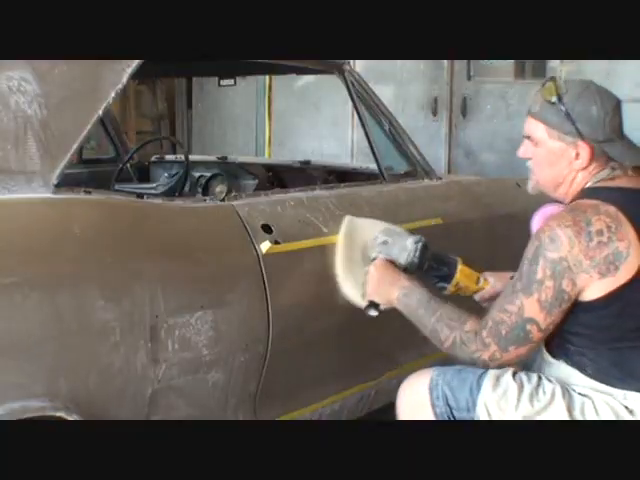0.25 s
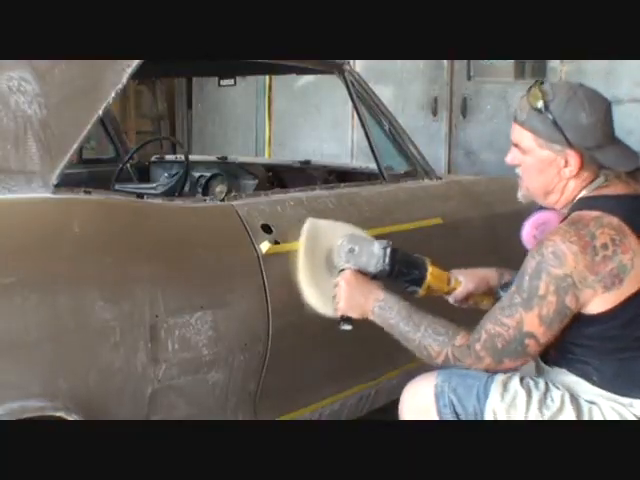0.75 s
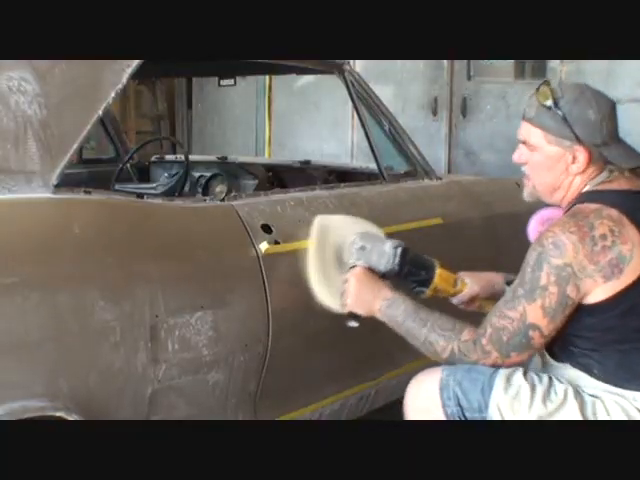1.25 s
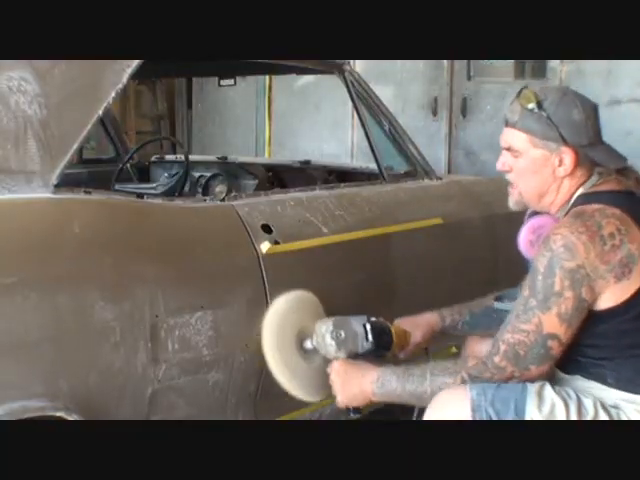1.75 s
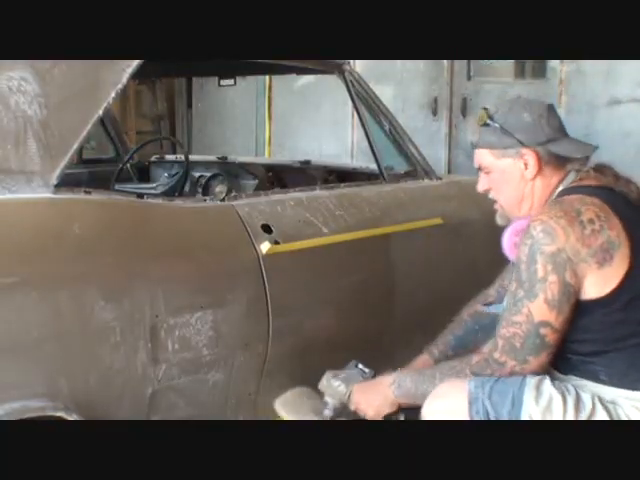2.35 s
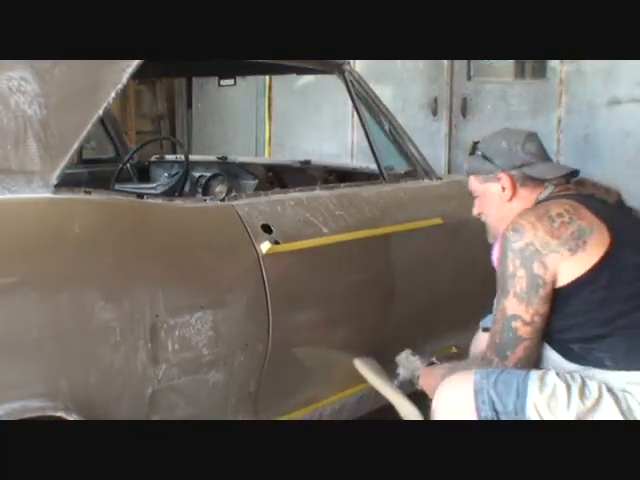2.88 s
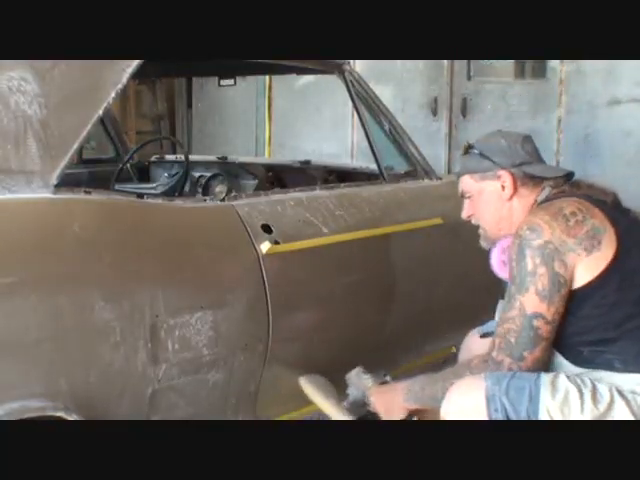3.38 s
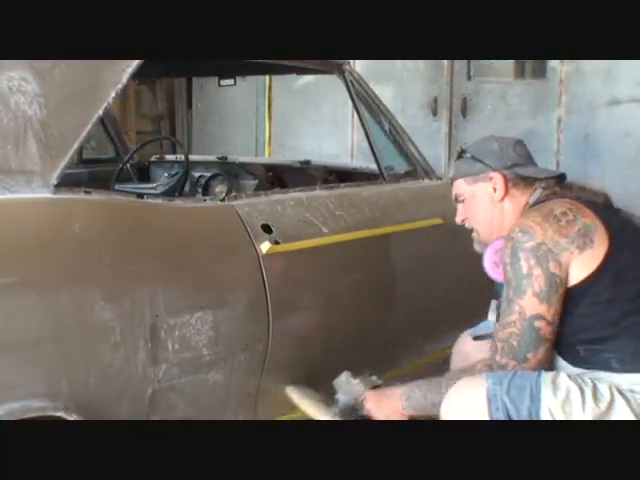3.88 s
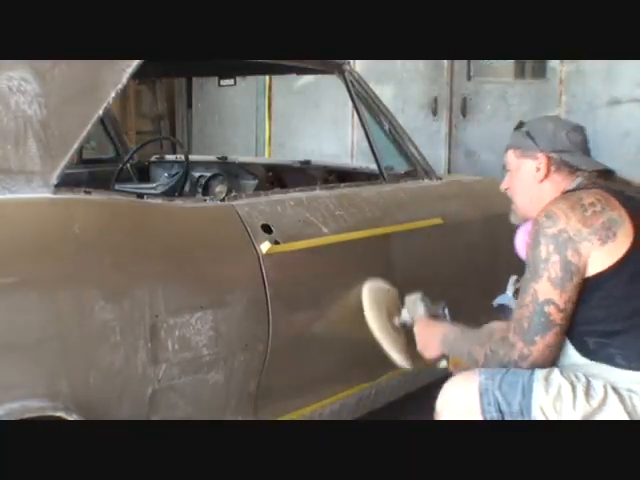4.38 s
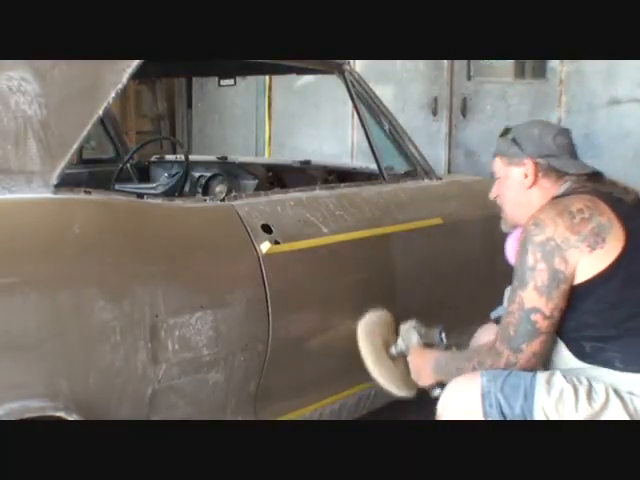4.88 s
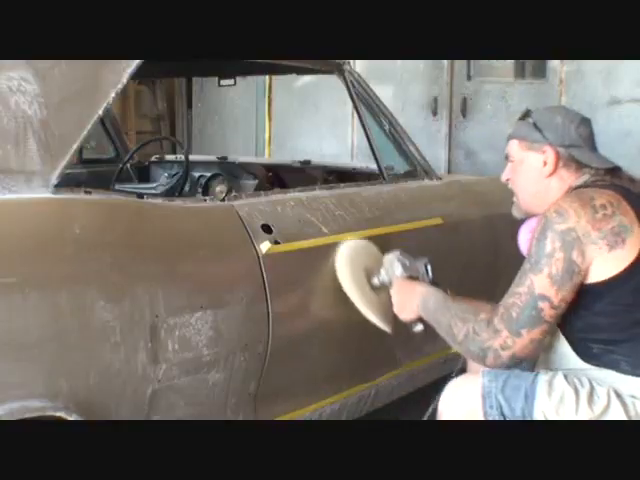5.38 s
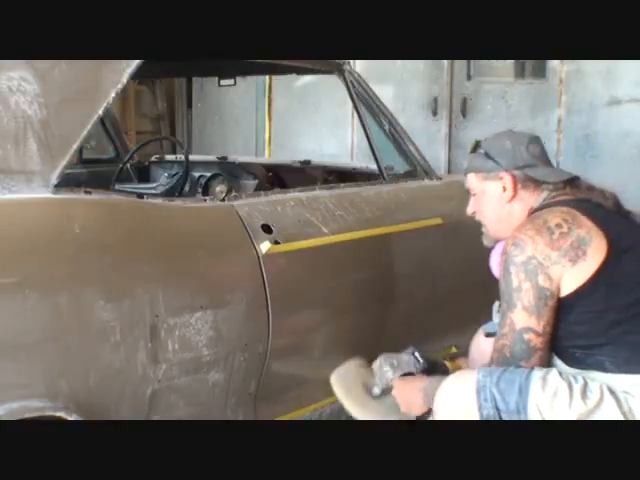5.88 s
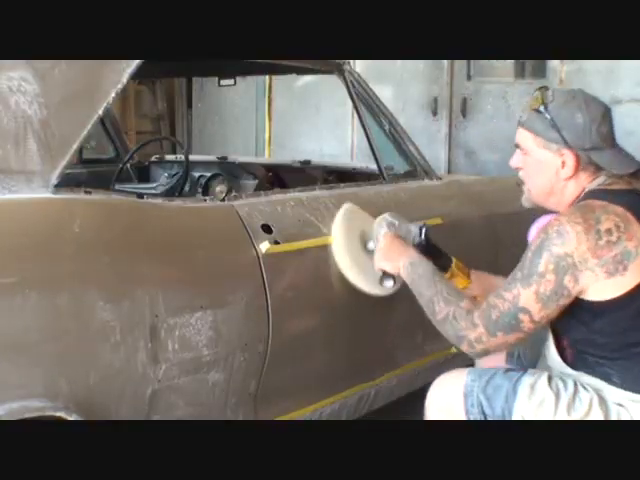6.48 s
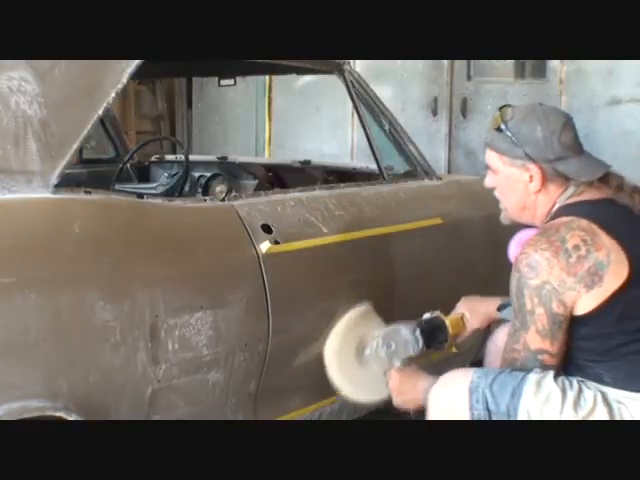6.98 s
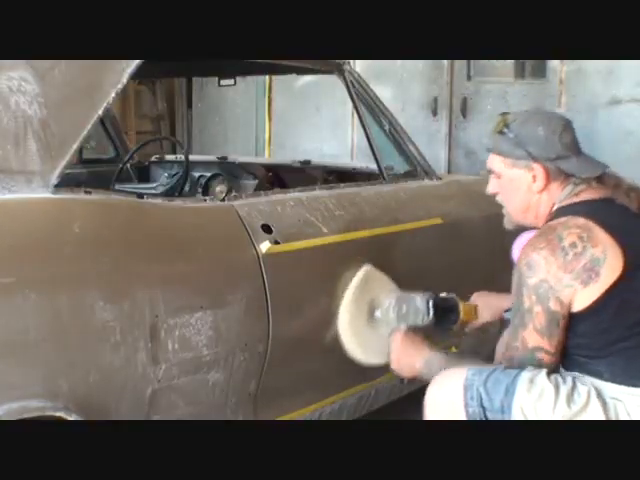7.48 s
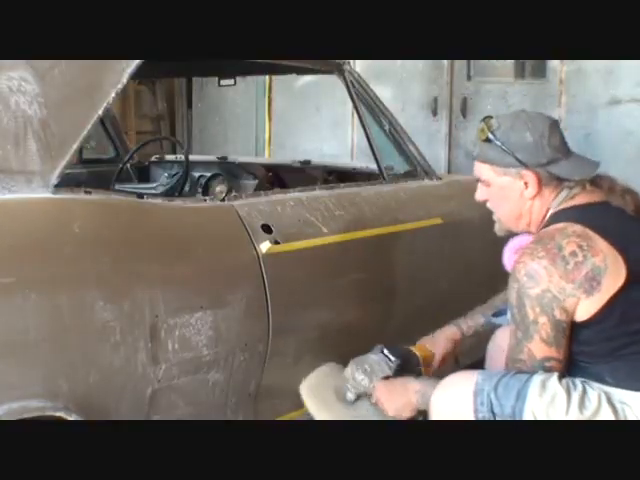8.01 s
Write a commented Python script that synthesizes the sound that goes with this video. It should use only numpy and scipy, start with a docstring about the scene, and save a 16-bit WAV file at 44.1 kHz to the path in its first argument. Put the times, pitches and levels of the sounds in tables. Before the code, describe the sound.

Continuous power polisher on a metal car panel in a reverberant garage. The high whine wavers in pitch and loudness, sometimes with a sharper octave above it, sometimes almost buried in rushing air. The spinning pad scrubs and hisses on the paint, the door drones softly, and a faint rumble sits below. The nearby microphone's gain pumps, pulling the hiss down under each loud whine.

```python
"""A fluttering gear whine swells and fades over rushing air and hiss: a rotary buffer polishes a car door.
One shaft phase drives mesh, motor and pad tones; its speed sags a little when the pad is pressed harder.
Shaped noise makes the fan rush, the pad's rub and hiss on the paint, the door drone and a faint rumble.
Drifting reflections from door and garage walls make the tones swell and fade as the tool is swept about,
and an automatic gain control ducks the hiss under every swell."""
import sys
import numpy as np
from scipy import signal
from scipy.fft import rfft, irfft, next_fast_len
from scipy.io import wavfile
from scipy.ndimage import uniform_filter1d, minimum_filter1d, map_coordinates

SR = 44100
rng = np.random.default_rng(int(sys.argv[2]) if len(sys.argv) > 2 else 0)


def transcribe(signal):
    """Save signal, clipped to [-1, 1], as a 16-bit WAV file at the path in sys.argv[1]."""
    frames = np.atleast_2d(signal).T
    limited = np.clip(frames, -1, 1)
    pcm = np.round(limited * 32767).astype(np.int16)
    wavfile.write(sys.argv[1], SR, pcm)


N = 363825  # samples

PINION_TEETH = 6
GEAR_RATIO = 9  # shaft turns per pad turn


def amp(db):
    """Decibels to gain."""
    return 10 ** (np.asarray(db) / 20)


def unit(x):
    """Scale to rms 1."""
    return x / np.sqrt(np.mean(np.abs(x) ** 2) + 1e-20)


def curves(rows):
    """Interpolate each column after the time to one value per sample."""
    time_s, *columns = np.transpose(rows)
    return [np.interp(np.arange(N) / SR, time_s, column) for column in columns]


def wobble(rate_hz):
    """Smooth random curve of rms 1 with rate_hz knots a second."""
    knots = rng.standard_normal(4096)
    coarse = np.arange(0, N + 16, 16)  # splined every 16 samples, linear between
    curve = map_coordinates(knots, [coarse * rate_hz / SR], mode="wrap")
    return unit(np.interp(np.arange(N), coarse, curve))


def filtered(x, response):
    """Multiply the spectrum of x by a response of frequency in Hz."""
    size = next_fast_len(N + 8192)
    return irfft(rfft(x, size) * response(np.fft.rfftfreq(size, 1 / SR)), size)[:N]


def rush(spectrum, patchy_db):
    """Rushing noise of rms 1: shaped white noise with brief time-frequency patches of random gain."""
    cells = signal.stft(rng.standard_normal(N), nperseg=1024)[2]
    field = uniform_filter1d(rng.standard_normal(cells.shape), size=3, axis=0)
    field = uniform_filter1d(field, size=12, axis=1)
    noise = signal.istft(cells * amp(patchy_db * unit(field)), nperseg=1024)[1][:N]
    f_hz, level_db = np.transpose(spectrum)
    return unit(filtered(noise, lambda hz: amp(np.interp(np.log(hz + 1), np.log(f_hz), level_db))))


def tone(turns, scatter, rate_hz):
    """Tone of rms 1: direct sound plus reflections that drift in strength and phase."""
    paths = 1 + scatter * (wobble(rate_hz) + 1j * wobble(rate_hz))
    return unit(np.real(paths * np.exp(2j * np.pi * turns)))


def fading(depth_db, rate_hz):
    """Gain of a tone whose source moves through the standing waves of the garage."""
    return amp(depth_db * np.tanh(wobble(rate_hz)))


def loaded(law, sag_hz):
    """Gain of a part whose level follows the load, read from the sag of the mesh pitch."""
    free_db, db_per_hz = law
    return amp(free_db + db_per_hz * sag_hz)


def garage(x, wet_db, t60_s):
    """A gliding tone beats against its own decaying echoes; the mean level is held steady."""
    t = np.arange(SR // 2) / SR
    tail = rng.standard_normal(len(t)) * amp(-60 * t / t60_s)
    echoes = signal.fftconvolve(x, tail / np.linalg.norm(tail))[:N]
    heard = x + amp(wet_db) * echoes
    power = uniform_filter1d(uniform_filter1d(heard ** 2, size=2000), size=2000)
    return heard / np.sqrt(np.abs(power) + 1e-6)


def rumble(level_db=-52.5, swell_db=3.5):
    """Faint low rumble of uneven level."""
    # rumble spectrum: f/Hz, relative density/dB
    rumble_spectrum = [(20, -19), (150, -11), (250, -2.5), (350, -1.5), (480, -2), (800, -42)]
    return amp(level_db + swell_db * wobble(7)) * rush(rumble_spectrum, patchy_db=-2)


def air_and_pad(shaft):
    """The pad rubs and hisses on the paint and sets the door droning; the fan chops its air once a shaft turn."""
    # levels as the pad travels over the door: t/s, pad hiss/dB, pad rub/dB, panel drone/dB, fan/dB
    contact = [(0.0, -20, -21, -33, -21.0), (0.93, -22, -22, -42, -19.5), (1.11, -21.0, -24.5, -34, -21.5),
               (1.68, -22.5, -23.5, -45, -20.5), (2.07, -21.5, -25.5, -35, -19),
               (2.55, -21.0, -23, -37.5, -20.5), (3.48, -23, -25, -31.5, -20.5),
               (4.02, -23, -25.5, -36, -21.5), (4.92, -22.5, -26.5, -39.5, -19),
               (5.19, -22, -22, -33.5, -19), (5.49, -22.5, -26, -39.5, -20.5),
               (6.81, -20, -23.5, -39, -19.5), (7.11, -21, -25, -35, -22.0),
               (7.38, -21.5, -24.5, -40.5, -18), (8.07, -20, -23.5, -33, -21.0),
               (8.25, -20.5, -24, -33, -18.5)]
    # door panel drone, pad rub, fan rush and pad hiss spectra: f/Hz, relative density/dB
    panel_spectrum = [(200, -29.5), (330, -16), (410, -6.5), (490, 1), (640, 1), (760, -2.5), (1100, -39)]
    rub_spectrum = [(450, -28), (650, -9), (780, -2), (1050, 1.5), (1350, 2), (1600, 1), (2100, -23),
                    (4000, -60)]
    fan_spectrum = [(900, -61), (1400, -10.5), (1700, 3), (2050, 1), (2300, -0.5), (2700, 1.5), (3150, 3),
                    (3500, -8), (4500, -17), (8000, -60)]
    hiss_spectrum = [(2000, -44), (3000, -4), (3600, -1.5), (4200, 1.5), (5000, 2), (6200, 1), (7200, -0.5),
                     (8200, -2), (9400, -4.5), (10100, -8), (10800, -8.5), (11600, -15), (13500, -18),
                     (15500, -25)]

    hiss_db, rub_db, panel_db, fan_db = curves(contact)
    chop = 1 + 0.036 * tone(shaft, scatter=0.92, rate_hz=110)
    # uneven wool drags in bursts, twice a pad turn and at random
    twice_a_turn = tone(2 * shaft / GEAR_RATIO, scatter=1.8, rate_hz=65)
    nap = amp(1.08 * twice_a_turn + 0.66 * wobble(130))
    panel = amp(panel_db) * rush(panel_spectrum, patchy_db=2.5)
    rub = amp(rub_db) * unit(nap * rush(rub_spectrum, patchy_db=1.67))
    fan = amp(fan_db) * unit(chop * rush(fan_spectrum, patchy_db=2.5))
    hiss = amp(hiss_db) * unit(chop * nap * rush(hiss_spectrum, patchy_db=2.5))
    return panel + rub + fan + hiss


def housing():
    """Narrow housing resonances, stirred by the air flow, swell and die away now and then."""
    # swells: peak t/s, length between 1/e points/s, level/dB
    rings = [(1.71, 0.35, -22.5), (4.313, 0.18, -27), (4.78, 0.23, -24.5), (5.59, 0.12, -26),
             (7.714, 0.26, -29)]
    # housing resonances: f/Hz, width at -6 dB/Hz, relative level/dB
    resonances = [(927.5, 47, -10), (2551.6, 47, -4)]

    def body(hz):
        """Sum of squared one-pole resonances."""
        return sum(amp(db) / (1 + 2j * (hz - f_hz) / width_hz) ** 2 for f_hz, width_hz, db in resonances)

    t = np.arange(N) / SR
    swell = sum(amp(db) * np.exp(-(2 * (t - peak_s) / length_s) ** 2) for peak_s, length_s, db in rings)
    return swell * unit(filtered(rng.standard_normal(N), body))


def motor(shaft, sag_hz, orders_db=-21.0):
    """Fan, teeth and armature sing at shaft multiples; load favours the teeth, speed the armature."""
    # weak motor tones: multiple of shaft speed, level re orders_db/dB
    orders = [(4, -15.5), (8, -13), (11, -23), (15, -21), (20, -21), (22, -16.5), (24, -20), (27, -15.5),
              (30, -20), (36, -24), (42, -41)]
    # load laws of third mesh harmonic and armature whistle: level running free/dB, slope/(dB per Hz of sag)
    third_law = (-34.5, 0.035)
    whistle_law = (-29.5, -0.068)
    armature_order = 21  # whistle cycles per shaft turn

    third = loaded(third_law, sag_hz) * tone(3 * PINION_TEETH * shaft, scatter=0.99, rate_hz=55)
    armature = loaded(whistle_law, sag_hz) * tone(armature_order * shaft, scatter=1.4, rate_hz=70)
    weak = sum(amp(orders_db + db) * tone(order * shaft, scatter=0.89, rate_hz=55) for order, db in orders)
    return third * fading(depth_db=3, rate_hz=7) + armature * fading(depth_db=3.5, rate_hz=7) + weak


def gear_whine(shaft, sag_hz, whine_gain_db=0.47, octave_flutter_db=-8, grit_db=-7, grit_hz=260):
    """Pinion teeth strike the crown wheel, whose uneven load on each pad turn adds sidebands."""
    # whine as the tool is swept about: t/s, level before whine_gain_db/dB
    whine_levels = [(0.0, -7), (0.26, -14), (0.5, -5), (0.6, -6), (0.66, -15), (0.82, -13), (0.9, -2.5),
                    (0.96, -10), (1.52, -11), (1.62, -19), (1.72, -23), (1.82, -17.5), (1.88, -19.5),
                    (2.14, -9.5), (2.2, -19), (2.26, -8), (2.76, -11.5), (2.8, -14.5), (2.86, -9.5),
                    (3.08, 0.5), (3.2, -9.5), (3.58, -7.5), (3.7, -14), (3.88, -0.5), (4.02, -19),
                    (4.12, -8.5), (4.21, -14), (4.31, -10), (4.39, -23), (4.47, -10.5), (4.59, -20),
                    (4.77, -11.5), (4.91, -19), (4.99, -8.5), (5.15, -3.5), (5.37, -8), (5.45, -23.5),
                    (5.61, -9.5), (5.67, -22), (5.75, -14.5), (5.85, -19.5), (5.97, -12), (6.03, -18.5),
                    (6.09, -7), (6.13, -16.5), (6.29, -9), (6.39, -19), (6.47, -12), (6.69, -12),
                    (6.87, -19.5), (6.93, -11), (7.03, -18.5), (7.53, -15), (7.57, -20), (7.95, -9.5),
                    (8.25, -14.5)]
    # octave of the whine, which beams in other directions: t/s, level/dB
    octave_levels = [(0.0, -23.5), (0.66, -21), (1.02, -27), (1.06, -13.5), (1.12, -25.5), (2.1, -24.5),
                     (2.34, -11.5), (2.58, -25.5), (2.8, -22.5), (2.86, -18), (3.74, -19.5), (4.0, -26.5),
                     (4.12, -13), (4.19, -25), (5.11, -23), (5.19, -19), (5.29, -24), (6.03, -26),
                     (6.11, -18.5), (6.23, -25.5), (6.47, -15.5), (6.81, -24), (7.55, -18), (7.65, -30),
                     (7.79, -24), (7.93, -11.5), (8.01, -23), (8.25, -14.5)]
    # mesh sidebands: offset in multiples of pad speed, level re flutter/dB
    sidebands = [(-4, -8.5), (-2, -5.5), (-1, -7.5), (1, -6.5), (2, -10), (4, -7.5)]
    # load law of the flutter: level running free/dB, slope/(dB per Hz of sag)
    flutter_law = (-22, -0.0066)

    whine_db, = curves(whine_levels)
    octave_db, = curves(octave_levels)
    flutter = loaded(flutter_law, sag_hz) * fading(depth_db=3.5, rate_hz=8)
    mesh, pad = PINION_TEETH * shaft, shaft / GEAR_RATIO  # cycles, pad turns

    mesh_tone = tone(mesh, scatter=0.089, rate_hz=54)
    octave_tone = tone(2 * mesh, scatter=0.23, rate_hz=50)
    whine = amp(whine_db + whine_gain_db) * garage(mesh_tone, wet_db=-6.5, t60_s=0.33)
    octave = amp(octave_db) * garage(octave_tone, wet_db=-5.5, t60_s=0.19)
    for offset, db in sidebands:
        whine += flutter * amp(db) * tone(mesh + offset * pad, scatter=3.3, rate_hz=36)
        octave_side = tone(2 * mesh + offset * pad, scatter=6, rate_hz=44)
        octave += amp(octave_db + octave_flutter_db + db) * octave_side
    # backlash: no two teeth land alike
    grit = flutter * amp(grit_db) * tone(mesh, scatter=3.7, rate_hz=grit_hz)
    return whine * fading(depth_db=3, rate_hz=17) + octave * fading(depth_db=3.5, rate_hz=16) + grit


def scene(jostle_hz=4):
    """One shaft drives every part of the tool; the sag of its speed tells the load."""
    # motor speed, sagging as the pad is pressed on: t/s, gear mesh f/Hz before jostle
    speed = [(0.0, 1515), (0.14, 1520), (0.28, 1472), (0.42, 1546), (0.68, 1579), (0.94, 1562),
             (1.24, 1514), (1.36, 1588), (1.86, 1614), (2.2, 1558), (2.66, 1528), (2.74, 1566),
             (2.84, 1567), (3.04, 1512), (3.32, 1517), (3.52, 1499), (4.1, 1578), (4.37, 1571),
             (4.81, 1590), (4.97, 1577), (5.23, 1503), (5.51, 1572), (5.63, 1594), (5.95, 1550),
             (6.13, 1586), (6.23, 1498), (6.33, 1568), (6.67, 1584), (6.81, 1561), (7.49, 1571),
             (7.55, 1550), (7.77, 1584), (8.03, 1497), (8.25, 1543)]
    free_hz = 1600  # mesh pitch of the free-running tool

    mesh_hz, = curves(speed)
    sag_hz = free_hz - mesh_hz
    jostled_hz = mesh_hz + jostle_hz * wobble(22)  # the drag of the pad jostles the speed
    shaft = np.cumsum(jostled_hz) / PINION_TEETH / SR  # turns
    background = rumble() + air_and_pad(shaft) + housing()
    return (background + motor(shaft, sag_hz) + gear_whine(shaft, sag_hz))[None]


def gain_control(x, pivot_db=-8.5, squeeze=0.54, attack_s=0.015, release_db_per_s=70):
    """Gain drops quickly and recovers slowly, so the hiss ducks whenever the whine swells."""
    width = max(int(attack_s * SR), 1)
    level_db = 10 * np.log10(np.abs(uniform_filter1d(x ** 2, size=width)) + 1e-9)
    fall_db = release_db_per_s * np.arange(N) / SR
    held_db = np.maximum.accumulate(level_db + fall_db) - fall_db  # peak hold with linear dB release
    held_db = uniform_filter1d(held_db, size=width)
    return x * amp(-squeeze * (held_db - pivot_db))


def record(dry, ceiling=0.83, top_hz=15500):
    """Gain control, a limiter on the highest peaks, then a sharp cut at top_hz."""
    x = gain_control(dry[0])
    needed = np.minimum(1, ceiling / (np.abs(x) + 1e-9))
    gain = minimum_filter1d(needed, size=300)
    gain = uniform_filter1d(uniform_filter1d(gain, size=400), size=300)
    return filtered(gain * x, lambda hz: hz < top_hz)[None]


dry = scene()
out = record(dry)
transcribe(out)
```